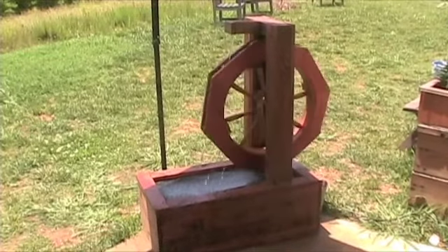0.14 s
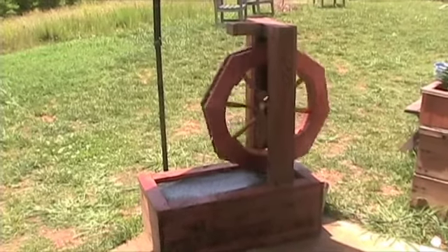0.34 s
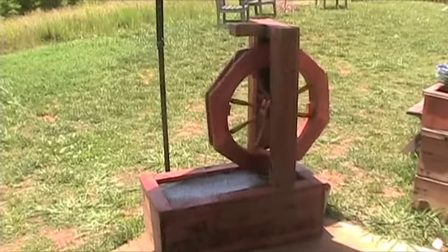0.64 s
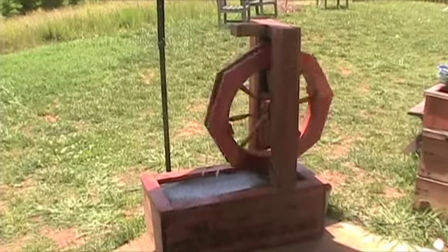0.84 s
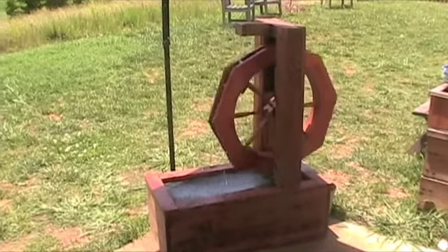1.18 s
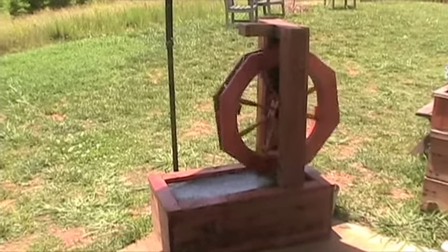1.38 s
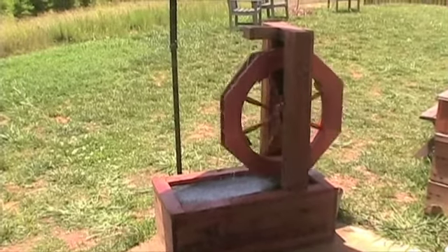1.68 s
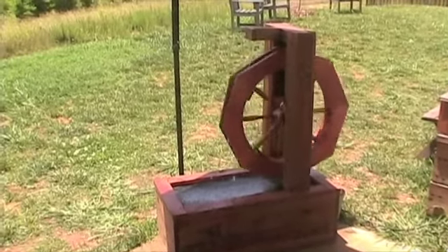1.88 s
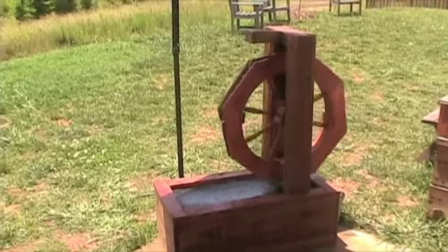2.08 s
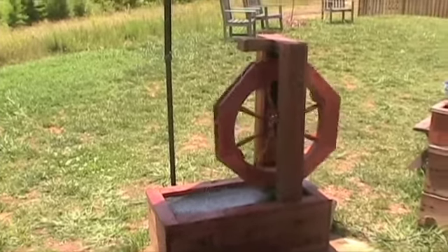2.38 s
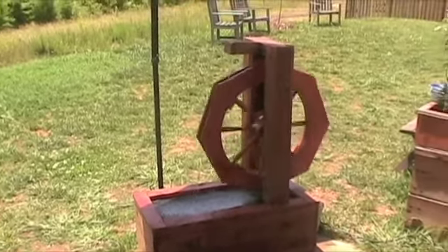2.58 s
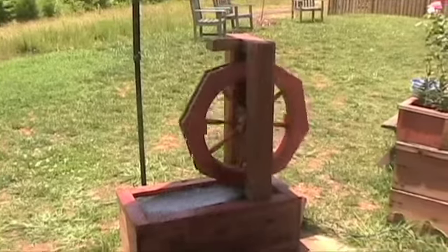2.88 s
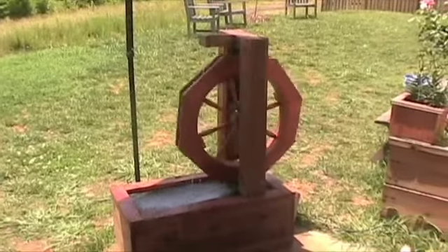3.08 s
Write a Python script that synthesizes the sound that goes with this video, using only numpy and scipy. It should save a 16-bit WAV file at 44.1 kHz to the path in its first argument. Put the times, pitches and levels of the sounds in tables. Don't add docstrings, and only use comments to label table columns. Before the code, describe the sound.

Small garden water wheel splashing rhythmically into a trough, with low machine hum and wind buffeting

```python
import sys
import numpy as np
from scipy import signal
from scipy.fft import rfft, irfft
from scipy.io import wavfile
from scipy.ndimage import uniform_filter1d

SR = 44100
rng = np.random.default_rng(int(sys.argv[2]) if len(sys.argv) > 2 else 0)


def unload_audio(sound):
    columns = np.transpose(np.atleast_2d(sound))
    steps = np.round(np.clip(columns, -1, 1) * 32767)
    wavfile.write(sys.argv[1], SR, steps.astype(np.int16))


def gain_from_db(level_db):
    decades = np.asarray(level_db, float) / 20
    return 10 ** decades


N = 142443
MOTOR_HZ = 59.19


def evened(x):
    return x / np.sqrt(np.mean(x ** 2) + 1e-20)


def add(mix, start_s, sound):
    part = mix[max(round(start_s * SR), 0):][:len(sound)]
    part += sound[:len(part)]


def follow(points):
    return np.interp(np.arange(N) / SR, *np.transpose(points))


def colour(x, points):
    point_hz, point_db = np.transpose(points)
    hz = np.fft.rfftfreq(N, 1 / SR)
    gain = gain_from_db(np.interp(np.log(hz + 1), np.log(point_hz), point_db))
    return evened(irfft(rfft(x) * gain, N))


def drift(rate_hz):
    t = np.arange(0, N, 100) / SR
    slow = 0
    for hz in np.geomspace(rate_hz / 20, rate_hz, num=16):
        slow = slow + np.sin(2 * np.pi * (hz * t + rng.random())) / np.sqrt(hz)
    return np.interp(np.arange(N) / SR, t, evened(slow))


def hiss(points, patchy_db):
    grains = signal.stft(rng.standard_normal(N), nperseg=512)[2]
    patches = uniform_filter1d(rng.standard_normal(grains.shape), size=6, axis=0)
    patches = evened(uniform_filter1d(patches, size=8, axis=1))
    noise = signal.istft(grains * gain_from_db(patchy_db * patches), nperseg=512)[1][:N]
    return colour(noise, points)


def tones(base_hz, orders, waver_db, wander):
    turns = np.cumsum(base_hz * (1 + wander * drift(2.955))) / SR
    out = np.zeros(N)
    for multiple, db in orders:
        level = np.sqrt(2) * gain_from_db(db + waver_db * drift(16))
        out += level * np.sin(2 * np.pi * (multiple * turns + rng.random()))
    return out


def surroundings():
    # frequency in Hz, level in dB per Hz.
    diffuse_air = [(30, 2), (100, 1), (250, 14), (500, 10.5), (1200, 4), (2500, -5.5), (6000, -24),
                   (14000, -82)]
    # multiple of the shaft speed, level in dB.
    hum_across = [(7, -62), (13, -65), (15, -66), (21, -69)]
    air = gain_from_db(-45) * hiss(diffuse_air, patchy_db=0.0)
    return air + tones(MOTOR_HZ, hum_across, waver_db=0.0, wander=0.00068)


def far_engine():
    # multiple of the idle speed, level in dB.
    idle_orders = [(1, -65), (2, -52.5), (3, -52), (4, -59), (5, -69.5), (6, -54)]
    # frequency in Hz, level in dB per Hz.
    exhaust = [(60, -15), (120, -9.5), (240, -2.5), (400, 1.5), (550, -2), (800, -21.5), (2000, -36)]
    # time in seconds, level in dB.
    distance = [
        (0, 1),
        (.6, 1.5),
        (1.2, 2),
        (1.7, 1),
        (2.05, -3),
        (2.4, -4),
        (3.23, -6),
    ]
    idle = tones(41.26, idle_orders, waver_db=3, wander=.014)
    idle += gain_from_db(-39.5 + .6 * drift(40)) * hiss(exhaust, patchy_db=1.5)
    return gain_from_db(follow(distance)) * idle


def cooling_unit():
    # frequency in Hz, level in dB per Hz.
    fan_roar = [(30, -17), (60, -5), (150, -8.5), (280, 1.5), (480, 1), (1000, -1), (2000, -7.5),
                (4000, -32)]
    # multiple of the shaft speed, level in dB.
    motor_hum = [(7, -50.5), (8, -46.5), (12, -54), (13, -52), (22, -49), (23, -59)]
    roar = gain_from_db(-37.5 + 0.35 * drift(8.9)) * hiss(fan_roar, patchy_db=1.0)
    return roar + tones(MOTOR_HZ, motor_hum, waver_db=1.5, wander=0.00051)


def wind():
    # time in seconds, level in dB.
    gusts = [(0, -44), (.2, -39), (.5, -40), (.8, -39), (.9, -44), (1.2, -36), (1.4, -40), (1.65, -35.5),
             (1.8, -35), (2.03, -39), (2.09, -48), (2.13, -36), (2.24, -33), (2.28, -28), (2.43, -34),
             (2.6, -23), (2.9, -42), (3.12, -31)]
    # frequency in Hz, level in dB per Hz.
    rumble = [(15, 5), (45, -9), (85, 4.5), (200, -10.5), (400, -23.5), (900, -40), (3000, -90)]
    # frequency in Hz, level in dB per Hz.
    fast_air = [(40, -18), (100, 9), (220, -1), (400, -18), (900, -42), (3000, -90)]
    # centre in seconds, level in dB, frequency in Hz.
    buffets = [(0.459, -35, 84), (0.503, -31.7, 81), (0.551, -37, 89), (0.593, -22, 47), (0.636, -16, 68),
               (0.684, -25.8, 54), (0.759, -23.4, 71), (0.794, -30.1, 54), (0.986, -32, 62),
               (1.198, -25, 73), (1.247, -20, 61), (1.275, -32, 63), (1.536, -27, 56.7), (1.592, -23, 66),
               (1.623, -40, 68), (1.664, -38, 97), (1.7, -24, 70), (1.725, -17, 65), (1.754, -17, 64),
               (1.792, -18, 60), (1.815, -20, 80), (1.836, -15.5, 87), (1.895, -9, 62), (1.932, -21, 90),
               (1.957, -17, 190), (1.963, -9, 65), (2.013, -21, 84), (2.141, -17.5, 115), (2.16, -26, 90),
               (2.196, -17, 127), (2.216, -18, 110), (2.232, -24, 330), (2.241, -12, 101),
               (2.474, -15, 130), (2.481, -15, 260), (2.55, -14, 120), (2.575, -19, 110), (2.6, -14, 190),
               (2.625, -17, 80), (2.7, -24, 90), (3.09, -19, 65), (3.142, -21, 110), (3.2, -18, 75)]
    # centre in seconds, level in dB, frequency in Hz.
    thumps = [
        (2.155, -41, 80),
        (2.195, -38, 125),
        (2.239, -31, 120),
        (2.265, -22.5, 148),
        (2.485, -28, 250),
        (2.581, -36, 86),
        (2.595, -31.5, 149),
        (2.617, -28.5, 98),
    ]
    rasp_s, rasp_rise_s = 2.12, 0.012
    pop_s, pop_width_s = 2.2625, .0007
    buffet_cycles = .75
    t = np.arange(N) / SR

    across = gain_from_db(follow(gusts) + 2.5 * drift(30)) * colour(rng.standard_normal(N), rumble)
    rasp = np.clip((t - rasp_s) / rasp_rise_s, 0, 1) * np.clip((pop_s - t) / rasp_rise_s, 0, 1)
    across += gain_from_db(-28 + 2.0 * drift(88.0)) * rasp * colour(rng.standard_normal(N), fast_air)
    for centre_s, db, hz in buffets:
        cycles = (t - centre_s) * hz
        bell = np.exp(-(cycles / buffet_cycles) ** 2)
        across += gain_from_db(db - 1.5) * bell * np.cos(2 * np.pi * (cycles + rng.random()))

    u = (t - pop_s) / pop_width_s
    across += gain_from_db(-7.3) * (np.exp(-u ** 2 / 2) - .2 * np.exp(-u ** 2 / 40))

    both = gain_from_db(-19) * rasp * np.roll(across, 90)
    for centre_s, db, hz in thumps:
        cycles = (t - centre_s) * hz
        bell = np.exp(-(cycles / buffet_cycles) ** 2)
        both += gain_from_db(db) * bell * np.cos(2 * np.pi * (cycles - .1))
    return across, both


def knock():
    # frequency in Hz, level in dB, 60 dB decay time in seconds.
    frame_modes = [(745, 0, .027), (1000, -10, .014), (1350, -8, .014), (1800, -8, .009), (2350, -9, .009),
                   (2900, -11, .009), (3400, -10, .008), (520, -16, .014)]
    start_s, echo_s = 2.8921, .0036
    t, out = np.arange(2000) / SR, np.zeros(N)
    ring = 0
    for hz, db, t60_s in frame_modes:
        ring = ring + gain_from_db(-18 + db - 60 * t / t60_s) * np.sin(2 * np.pi * hz * t)
    ring = signal.sosfilt(signal.butter(2, [300, 3900], 'band', fs=SR, output='sos'), ring)
    add(out, start_s, ring)
    add(out, start_s + echo_s, -.3 * ring)
    add(out, start_s + 3 * echo_s, .25 * ring)
    return out


def flow():
    # start in seconds, pour length in seconds, strength in dB.
    pours = [(-.05, 0.073, -6), (0.26, .09, -1), (0.645, 0.09, 1.5), (0.959, 0.015, -4), (1.021, 0.095, 2),
             (1.204, 0.015, -5), (1.379, 0.035, 0.5), (1.752, 0.091, -2), (2.067, 0.086, -2.5),
             (2.394, 0.08, 0.5), (2.763, 0.14, -1.5), (3.159, 0.18, 1)]
    rise_s, fall_s, sag_db = 0.0061, 0.043, -3
    t, out = np.arange(N) / SR, np.zeros(N)
    for start_s, length_s, db in pours:
        u = t - start_s
        strength = gain_from_db(db + sag_db * np.clip(u / length_s, 0, 1))
        fall = np.exp(-np.maximum(u - length_s, 0) / fall_s)
        out += strength * np.clip(u / rise_s, 0, 1) * fall
    return out


def bubble(hz, cycles, glide):
    u = np.arange(int(4 * cycles * SR / hz) + 8) / SR * hz / cycles
    ring = np.sin(2 * np.pi * cycles * (u + glide * u ** 2))
    return ring * (1 - np.exp(-u / 0.19)) * np.exp(-1.6 * u)


def bubble_swarm(surge):
    trickle, bubbles_per_s = .12, 2000
    busy = (trickle + surge) * gain_from_db(4.7 * drift(40))
    born = rng.random(N) < busy * bubbles_per_s / SR
    strength = gain_from_db(1.9 * np.minimum(rng.exponential(1, N), 5)) * born
    kind = rng.integers(0, 30, size=N)
    swarm = np.zeros(N)
    for k, hz in enumerate(np.geomspace(1300, 13000, num=30)):
        one = bubble(hz, 3 + 14 * rng.random(), 0.048 * rng.random())
        swarm += signal.oaconvolve(strength * (kind == k), one)[:N]
    return swarm


def large_drops():
    # time in seconds, peak level in dB, bubble pitch in Hz, ring time in seconds.
    drops = [(.27, -27.5, 8060, 0.012), (.277, -18, 12000, .012), (.333, -33, 4300, .006),
             (.35, -32.5, 2620, .02), (0.412, -30, 2200, 0.014), (.653, -31, 10500, .006),
             (.658, -27.5, 8040, 0.021), (.72, -34, 7500, .014), (1.022, -31, 6760, .006),
             (1.021, -27, 9300, 0.0035), (1.039, -22, 5800, .012), (1.045, -27, 5960, .008),
             (1.055, -33, 6200, .008), (1.093, -28, 4470, .008), (1.105, -35, 6400, .012),
             (1.116, -31, 5500, 0.017), (1.135, -33, 5840, .01), (1.159, -31, 8500, 0.012),
             (1.424, -30, 6960, 0.013), (1.822, -26, 1700, .008), (1.825, -24, 2560, 0.0079),
             (1.831, -30, 3300, 0.0084), (1.836, -33, 4100, .008), (1.84, -25, 2700, .008),
             (1.862, -29, 7700, .012), (1.993, -28, 4030, 0.011), (2.125, -30, 7300, 0.012),
             (2.402, -34, 6000, 0.0068), (2.409, -33, 4530, .015), (2.45, -29, 5540, 0.014),
             (2.48, -32, 7000, .005), (2.466, -31.5, 4570, .01), (2.774, -31, 7140, 0.014),
             (2.779, -24.5, 9540, 0.014), (2.793, -28, 3700, 0.019), (2.855, -28.5, 4770, .014),
             (2.86, -31, 2370, .018), (3.167, -32, 8200, 0.013), (3.187, -27, 1790, .015),
             (3.2, -27, 5540, .014)]
    out = np.zeros(N)
    for start_s, db, hz, ring_s in drops:
        add(out, start_s, gain_from_db(db - 2) * bubble(hz, .2 * ring_s * hz, .04))
        for late, pitch in rng.random((12, 2)):
            splash = bubble(hz * (.84 + .3 * pitch + .12 * late), .06 * ring_s * hz, .05)
            add(out, start_s + 1.4 * late * ring_s, gain_from_db(db - 4 - 4 * late) * splash)
    return out


def water():
    # frequency in Hz, level in dB per Hz.
    splash_tone = [(800, -42), (1500, -8.5), (2500, -3.5), (4000, -5), (6500, -2), (9500, -2), (12000, 1.5),
                   (14200, -47)]
    # frequency in Hz, level in dB per Hz.
    stream_tone = [(800, -10.5), (1500, -0.5), (2500, -0.5), (4000, -2.5), (6500, -4.5), (9500, -9.5),
                   (12000, -11), (14200, -47)]
    surge = flow()
    bubbles = gain_from_db(-48.5) * colour(bubble_swarm(surge), splash_tone)
    fizz = gain_from_db(-42.5) * surge * hiss(splash_tone, patchy_db=5.5)
    stream = gain_from_db(-45.5 + 0.12 * drift(19)) * hiss(stream_tone, patchy_db=-0.5)
    return bubbles + fizz + stream + large_drops()


def scatter(x):
    t60_s = .04
    taps = np.zeros((2, 3000))
    at = np.arange(40, 2980, 20) + rng.integers(0, 20, size=(2, 147))
    np.put_along_axis(taps, at, rng.choice([-1., 1.], at.shape), 1)
    taps *= gain_from_db(-60 * np.arange(3000) / SR / t60_s)
    taps /= np.linalg.norm(taps[0])
    return gain_from_db(-13) * signal.oaconvolve(x[None], taps, axes=1)[:, :N]


def scene():
    # time in seconds, left minus right in dB.
    machine_balance = [
        (0, 1.4),
        (2.0, 1.2),
        (2.3, -1),
    ]
    water_left_db, left_lag_s = -.9, 4.3e-5
    half = np.array([[.5], [-.5]])
    wet = water()
    machines = cooling_unit() + far_engine()
    direct = gain_from_db(water_left_db * half) * wet + gain_from_db(follow(machine_balance) * half) * machines
    left, right = direct + knock()
    left = irfft(rfft(left) * np.exp(-2j * np.pi * np.fft.rfftfreq(N, 1 / SR) * left_lag_s), N)
    across, both = wind()
    across = across + surroundings()
    ports = np.array([left + both + across, right + both - across])
    ahead = gain_from_db(-6) * water()
    return ports + scatter(wet) + ahead


def low_pass(x):
    return signal.sosfilt(signal.butter(12, 14200, fs=SR, output="sos"), x)


def record(dry):
    filter_s, ramp_s = 2.275, 0.02
    side_cut_hz, side_leak_db = 1270, -22.5
    mid_cut_hz, mid_leak = 770, 0.83
    hz = np.fft.rfftfreq(N, 1 / SR)

    def low(x, edge_hz):
        return irfft(rfft(x) / (1 + (hz / edge_hz) ** 2), N)

    mid, side = (dry[0] + dry[1]) / 2, (dry[0] - dry[1]) / 2
    on = np.clip((np.arange(N) / SR - filter_s) / ramp_s, 0, 1)
    side = side - on * (1 - gain_from_db(side_leak_db)) * low(side, side_cut_hz)
    mid = mid - on * (1 - mid_leak) * low(mid, mid_cut_hz)
    mid = irfft(rfft(mid) / (1 + (hz / 10950) ** 16), N)
    return low_pass(np.array([mid + side, mid - side]))


dry = scene()
out = record(dry)
unload_audio(out)
```